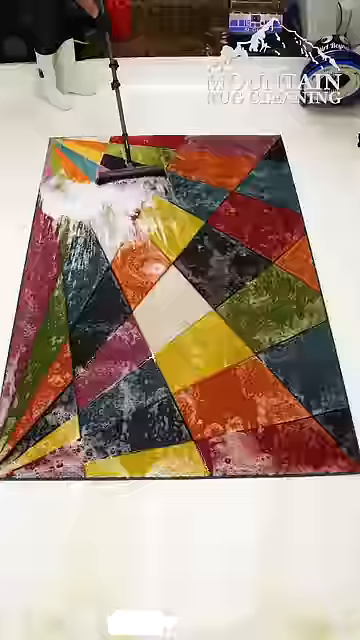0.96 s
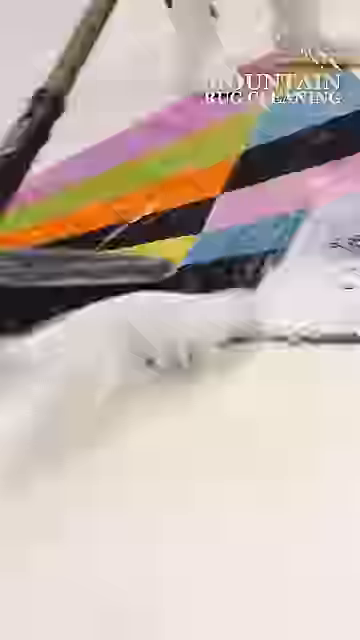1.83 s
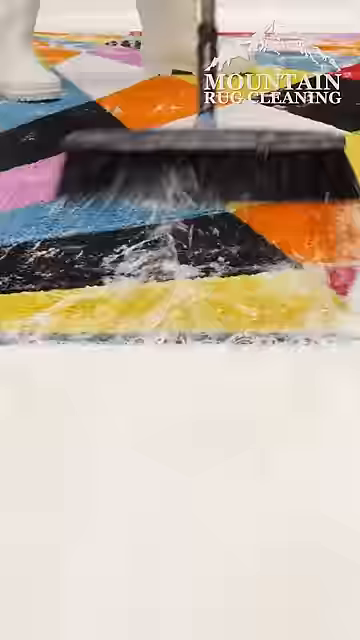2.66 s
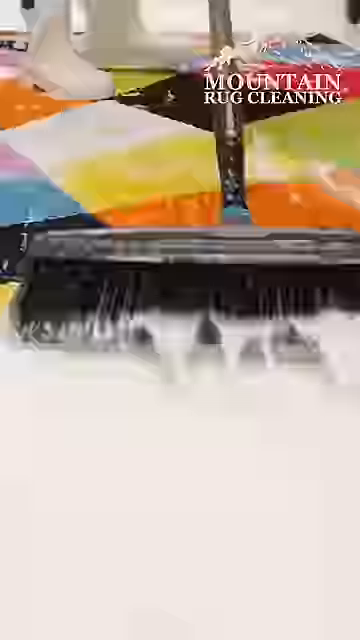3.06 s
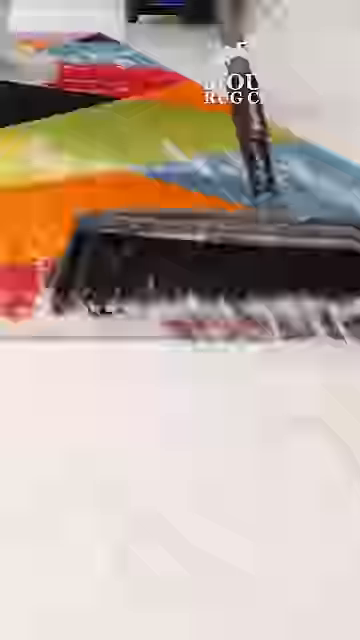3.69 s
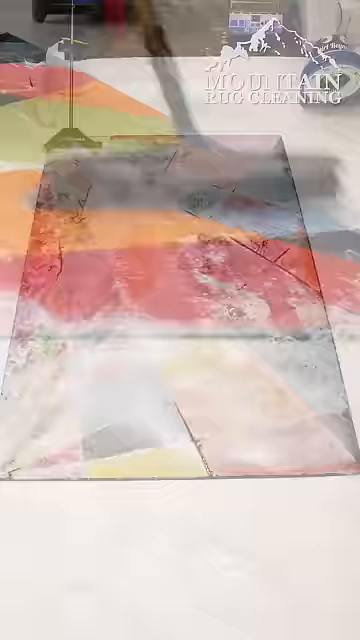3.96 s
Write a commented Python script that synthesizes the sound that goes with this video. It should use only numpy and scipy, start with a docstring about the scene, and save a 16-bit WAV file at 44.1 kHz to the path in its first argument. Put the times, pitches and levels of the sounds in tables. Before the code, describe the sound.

In a quiet room, directly in front of the microphone, a broom thuds onto a soapy rug and starts a fast, rasping scrub. Foam fizzes and the rug throbs underneath as the strokes become longer, with hard pushes and lighter returns. After about four seconds the scrubbing gives way to five slow, swishing, rumbling sweeps. Foam squelches after each, the broom head bumps dully, and bent bristles sometimes snap free.

```python
"""In a quiet room, a stiff push broom is set down on a wet, foamy rug and scrubs very quickly to and fro.
The strokes then grow longer, with hard pushes and light returns. The bristles rasp, the rug's backing
shudders and the broom head bumps on the padded floor. From four seconds on come five slow sweeps:
the pile (the rug's tufts) rumbles under the head, foam squelches at the end of each sweep,
and now and then bent bristles flick free."""
import sys
import numpy as np
from scipy import signal
from scipy.fft import rfft, irfft, next_fast_len
from scipy.io import wavfile
from scipy.ndimage import uniform_filter1d, minimum_filter1d

SR = 44100
rng = np.random.default_rng(int(sys.argv[2]) if len(sys.argv) > 2 else 0)


def master_out(mix):
    """Clip the mix to full scale and print it as 16-bit PCM to the path in sys.argv[1]."""
    frames = np.transpose(np.atleast_2d(mix))
    ceiling = np.clip(frames, -1, 1)
    pcm = np.round(ceiling * 32767).astype(np.int16)
    wavfile.write(sys.argv[1], SR, pcm)


N = 283122
TIME = np.arange(N) / SR

# tone (how strong each frequency is) of the rumbling pile and the swishing foam: f/Hz, level/dB
PILE_TONE = [(15, -48), (25, -19), (87, -4.5), (124, 0.5), (204, -4.5), (361, -8.5), (419, -16.5),
             (452, -16), (591, -21.5), (752, -21.5), (900, -21), (1170, -52), (1980, -120)]
FOAM_TONE = [(250, 1), (500, -2), (1000, -0.5), (2000, -4), (3800, -6), (5500, -10.5), (7500, -14.5),
             (10000, -21), (15500, -37.5)]
# stereo width of the quick strokes and of the slow sweeps: f/Hz, side minus mid/dB
# (mid is what left and right share, side is how they differ)
STROKE_WIDTH = [(30, -22), (90, -5), (160, -8.5), (280, -13), (450, -7), (680, -5.5), (850, -54),
                (2000, -79), (5000, -30.5), (14000, -28)]
SWEEP_WIDTH = [(30, -27), (100, -43), (180, -44), (320, -16), (600, -13), (1300, -19), (4400, -11),
               (8000, -7.5), (15000, 0)]
# how hard the arm scrubs: t/s, level/dB
ARM_EFFORT = [(0.14, -37), (0.25, -26.5), (0.36, -21.5), (0.47, -23), (0.7, -18.5), (0.9, -20),
              (1.25, -19.5), (1.45, -18.5), (1.73, -19), (2.3, -19), (3.08, -20), (4.04, -23), (4.11, -28),
              (4.22, -29.5)]
# slow sweeps: start/s, stop/s, time to bite in/s, rumble/dB, extra rumble as the tufts catch/dB,
# swish/dB, squelch/dB, extra width/dB
SWEEPS = [(3.954, 4.41, 0.16, -25, 8, -35.5, -33.5, 6), (4.601, 4.993, 0.19, -26, 4, -35, -31.5, 1),
          (5.192, 5.515, 0.17, -26.5, 3, -36, -31.5, -6.5),
          (5.747, 6.08, 0.084, -28, 4.5, -36.5, -30.5, -3), (6.325, 6.8, 0.1, -20, 3, -33.5, -32, 0)]


def from_db(db):
    """Turn decibels into a number to multiply by."""
    return 10 ** (np.asarray(db) / 20)


def rms_one(x):
    """Scale a signal so that its average strength (rms) is 1."""
    return x / np.sqrt(np.mean(x ** 2) + 1e-20)


def in_time(rows):
    """Join rows that start with a time by straight lines: one curve for each further column."""
    times, *columns = np.transpose(rows)
    return [np.interp(TIME, times, column) for column in columns]


def at_hz(points, hz):
    """Read a table's level in dB at these frequencies; past its ends it falls 30 dB an octave."""
    table_hz, level_db = np.transpose(points)
    octave, known = np.log2(np.maximum(hz, 1)), np.log2(table_hz)
    outside = np.maximum(known[0] - octave, 0) + np.maximum(octave - known[-1], 0)
    return np.interp(octave, known, level_db) - 30 * outside


def drift(rate_hz):
    """A smooth random wobble, about 1 in size; a higher rate wobbles faster."""
    pole = np.exp(-80 * np.pi * rate_hz / SR)
    noise = rng.standard_normal(N // 40 + 2002)   # one value every 40 samples
    slow = signal.lfilter([1], [1, -2 * pole, pole * pole], noise)[2000:]
    return np.interp(np.arange(N) / 40, np.arange(len(slow)), rms_one(slow))


def shaped_noise(tone, width):
    """Stereo noise of strength 1 with this tone and width, like countless tiny contacts merging."""
    size = next_fast_len(N)
    hz = np.fft.rfftfreq(size, 1 / SR)
    mid, side = rfft(rng.standard_normal((2, size))) * from_db(at_hz(tone, hz))
    mid = irfft(mid, size)[:N]
    side = irfft(side * from_db(at_hz(width, hz)), size)[:N]
    return rms_one(np.array([mid + side, mid - side]))


def ring(clicks, hz, ring_s):
    """Each click starts a pure note that fades by 60 dB in ring_s."""
    decay, angle = from_db(-60 / (ring_s * SR)), 2 * np.pi * hz / SR
    return signal.lfilter([0, np.sin(angle)], [1, -2 * decay * np.cos(angle), decay ** 2], clicks + 1e-18)


def gate(start, end, edge_s):
    """Fade in around start and out around end."""
    return (np.tanh((TIME - start) / edge_s) - np.tanh((TIME - end) / edge_s)) / 2


def with_travel(short, long):
    """Blend from the value for short strokes to the value for long ones as the broom travels further."""
    long_share = [(0.2, 0.01), (1.3, 0), (1.9, 0.41), (2.3, 0.91), (3.0, 1)]   # how long the quick strokes are: t/s, share of long travel/0-1
    return np.interp(in_time(long_share)[0], [0, 1], [short, long])


def stroke_count():
    """Strokes done so far; even ones are pushes, odd ones returns."""
    pace = [(0.118, 0), (1.177, 10), (1.807, 16), (2.263, 19), (3.349, 26), (4.156, 31), (4.32, 32)]   # about 9.5, later 6.4 to-and-fros a second: t/s, to-and-fros done
    cycles, = in_time(pace)
    push_share = with_travel(0.54, 0.59)   # of the time of one to-and-fro
    phase = cycles % 1
    in_return = 1 + (phase - push_share) / (1 - push_share)
    return 2 * np.floor(cycles) + np.where(phase < push_share, phase / push_share, in_return)


def stroke_speed(push_skew, return_skew):
    """Speed of the bristle tips, 0-1: zero at each turn; a skew above 1 makes it peak late."""
    done = stroke_count()
    skew = np.where(done % 2 < 1, push_skew, return_skew)
    return np.abs(np.sin(np.pi * (done % 1) ** skew))


def quiet_room(level_db=-52.5):
    """The room gives a faint, steady hush."""
    room_tone = [(25, -6), (120, -6), (400, 15), (1000, 1), (4000, -34), (10000, -50), (15500, -41)]   # the hush: f/Hz, level/dB
    return from_db(level_db) * shaped_noise(room_tone, STROKE_WIDTH)


def set_down(thud_db=-25, slosh_db=-41.5, thud_fall_db_per_s=230, slosh_fall_db_per_s=95):
    """The broom lands in the foam: a dull thud and a wet slosh die away."""
    thud = from_db(thud_db - thud_fall_db_per_s * TIME) * shaped_noise(PILE_TONE, STROKE_WIDTH)
    slosh = from_db(slosh_db - slosh_fall_db_per_s * TIME) * shaped_noise(FOAM_TONE, SWEEP_WIDTH)
    return (thud + slosh) * gate(0.00067, 1, 0.0015) * gate(-1, 0.17, 0.038)


def head_bumps(vary_db=5.0):
    """Each bump makes the broom head and padded floor ring briefly, each note with its own strength."""
    bump_list = [(0.002, -10.5), (0.235, -24), (0.407, -7), (0.43, -5), (0.531, -17), (0.845, -14.5),
                 (1.28, -21), (1.391, -20), (1.603, -17), (2.784, -22), (3.859, -24), (4.012, -16),
                 (4.154, -16), (4.171, -10), (4.353, -15), (4.618, -16), (4.854, -18), (5.382, -10),
                 (5.905, -16.5), (6.392, -14.5)]   # the head hits the rug: t/s, level/dB
    head_notes = [(75, -7, 0.072), (116, -9.5, 0.17), (161, -8, 0.066), (223.4, -9, 0.087),
                  (313, -25, 0.075), (415, -20, 0.076)]   # notes of head and floor: f/Hz, level/dB, time to fade by 60 dB/s
    times, bump_db = np.transpose(bump_list)
    chance = rng.standard_normal((len(bump_list), len(head_notes)))
    out = np.zeros(N)
    for k, (hz, note_db, ring_s) in enumerate(head_notes):
        clicks = np.zeros(N)
        clicks[(times * SR).astype(int)] = from_db(bump_db + note_db + vary_db * chance[:, k])
        out += (-1) ** k * ring(clicks, hz, ring_s)
    return out


def quick_scrub(slide_db=1.83, fizz_db=-3.5, fizz_s=0.051, uneven_db=0.96, hollow_db=-6.0,
                treble_hz=5500, treble_lag_s=0.00085):
    """Bristles rasp louder with speed, fast pushes ring hollow, and foam fizzes through the turns."""
    short_tone = [(150, -43), (250, -17.5), (499, -4), (563, -6), (795, -1.5), (961, -3), (1100, 0),
                  (1360, -2.5), (1530, -3.5), (1730, -4), (3330, -4), (8320, -13.5), (11200, -23),
                  (15500, -35)]   # bristles on the pile, short strokes: f/Hz, level/dB
    long_tone = [(240, -23), (400, -21), (419, -18.5), (560, -11.5), (653, -3), (847, -0.5), (1260, -5),
                 (1630, -3), (2360, -7.5), (3850, -6), (5820, -10), (8280, -10), (9790, -12), (13700, -28),
                 (15500, -36)]   # the same for longer strokes: f/Hz, level/dB
    hollow_tone = [(520, -23), (680, -5.5), (850, 4.5), (1080, -7.5), (1300, -9), (1650, 0.5), (2100, -7)]   # ring of the foam packed between the bristles: f/Hz, level/dB
    pushing = stroke_count() % 2 < 1
    effort_db, = in_time(ARM_EFFORT)
    return_db = np.where(pushing, 0, with_travel(-1, -5))   # longer strokes come back more lightly
    pressure = from_db(effort_db + return_db) * gate(0.14, 4.25, 0.019)
    speed = stroke_speed(push_skew=0.88, return_skew=0.97)
    slide = from_db(slide_db) * pressure * speed ** np.where(pushing, 1.27, 0.92)
    lowest_pressure = minimum_filter1d(pressure, int(fizz_s * SR))
    fizz = from_db(fizz_db) * uniform_filter1d(lowest_pressure, int(fizz_s * SR / 2))
    level = np.hypot(slide, fizz) * from_db(uneven_db * drift(37))
    travel = with_travel(0, 1)
    rasp = np.sqrt(1 - travel) * shaped_noise(short_tone, STROKE_WIDTH)
    rasp += np.sqrt(travel) * shaped_noise(long_tone, STROKE_WIDTH)
    dull = signal.sosfiltfilt(signal.butter(2, treble_hz, fs=SR, output="sos"), rasp)
    # the fine hiss of the tips trails the rasp of the bending bristles
    hiss = np.interp(TIME - treble_lag_s, TIME, level) * (rasp - dull)
    hollow_level = from_db(hollow_db) * pushing * pressure * speed ** 2.7
    return level * dull + hiss + hollow_level * shaped_noise(hollow_tone, STROKE_WIDTH)


def rug_backing(throb_db=8.5, jolt_db=4.5):
    """The rug's backing shudders in step with the effort and is jolted as each push begins."""
    deep_tone = [(13, -41), (22, -12), (43, -20.5), (81, -7), (97, -10), (130, -13.5), (170, -44),
                 (290, -120)]   # the deepest shudder: f/Hz, level/dB
    body_tone = [(53, -42), (90, -18), (107, -11.5), (124, -7), (145, -3), (421, -12), (450, -15),
                 (580, -44), (990, -120)]   # the low throb above it: f/Hz, level/dB
    effort_db, = in_time(ARM_EFFORT)
    throb = throb_db * (stroke_speed(push_skew=1.3, return_skew=0.81) - 2 / np.pi)
    jolt = jolt_db * np.cos(np.pi * stroke_count())
    deep_db = -14.5 - 21 * with_travel(0, 1) ** 1.3   # short strokes shake it deepest
    body_db = with_travel(-16, -17)
    deep = from_db(effort_db + deep_db + jolt) * shaped_noise(deep_tone, STROKE_WIDTH)
    body = from_db(effort_db + body_db + throb) * shaped_noise(body_tone, STROKE_WIDTH)
    return (deep + body) * gate(0.15, 3.99, 0.0092)


def slow_sweeps(rest_rumble_db=-39.5, rest_swish_db=-44.5, bite_db=11, catch_lead_s=0.022, catch_s=0.034,
                foam_runs_on_s=0.077, judder_db=2.5, froth_db=1.0):
    """The head bites into the pile, judders along, catches and stops; the foam swishes on a little."""
    sweeping = gate(SWEEPS[0][0], 7, 0.008)
    # between sweeps the broom is drawn back lightly
    drag, swish = from_db(rest_rumble_db) * sweeping, from_db(rest_swish_db) * sweeping
    for start, stop, bite_s, rumble_db, catch_db, swish_db, _, _ in SWEEPS:
        bite = bite_db * (np.clip((TIME - start) / bite_s, 0, 1) - 1)
        catch = catch_db * np.exp(-((TIME - stop + catch_lead_s) / catch_s) ** 2)
        drag = np.hypot(drag, from_db(rumble_db + bite + catch) * gate(start, stop, 0.016))
        foam_sliding = gate(start, np.inf, 0.04) * gate(-np.inf, stop + foam_runs_on_s, 0.014)
        swish = np.hypot(swish, from_db(swish_db) * foam_sliding)
    pile = drag * from_db(judder_db * drift(29)) * shaped_noise(PILE_TONE, SWEEP_WIDTH)
    foam = swish * from_db(froth_db * drift(55)) * shaped_noise(FOAM_TONE, SWEEP_WIDTH)
    return pile + foam


def foam_squelches(delay_s=0.056, rise_s=0.062, fall_s=0.023, bubbling_db=4.0,
                   pitch_hz=1220, sink_octaves_per_s=16, spread_octaves=0.77):
    """As each sweep stops, foam pockets burst: a noise that swells, then sinks in pitch and dies."""
    out = np.zeros((2, N))
    for hz in np.geomspace(350, 5000, 9):
        power = np.zeros(N)
        for _, stop, *_, squelch_db, _ in SWEEPS:
            near = np.abs(TIME - stop) < 0.3
            since_peak = TIME[near] - stop - delay_s
            swell = np.exp(np.minimum(since_peak / rise_s, -since_peak / fall_s))
            octaves_off = np.log2(hz / pitch_hz) + sink_octaves_per_s * np.maximum(since_peak, 0)
            band_share = np.exp(-(octaves_off / spread_octaves) ** 2 / 2)
            power[near] += from_db(squelch_db) ** 2 * swell * band_share
        half_octave = signal.butter(2, [hz / 2 ** 0.25, hz * 2 ** 0.25], "band", fs=SR, output="sos")
        noise = rms_one(signal.sosfilt(half_octave, rng.standard_normal(N)))
        out += np.sqrt(power) / 2 * noise * from_db(bubbling_db * drift(55))
    return out


def bristle_flicks(patter_db=0.5):
    """Rows of bent bristles snap straight in a short, bright spray."""
    flick_list = [(4.571, 0.009, -33.5, 0.0012), (4.618, 0.022, -29, 0.0015), (4.644, 0.035, -27.5, 0.0055),
                  (4.684, 0.024, -24, 0.006), (4.725, 0.013, -32.5, .002), (4.779, 0.0084, -32, .0015),
                  (5.679, 0.0065, -37, .002), (5.771, 0.031, -29.5, 0.011), (6.388, 0.023, -30, .003)]   # bristles spring free: t/s, length/s, level/dB, edge softness/s
    flick_tone = [(880, -38), (1500, -5), (1770, -6), (2310, 2), (2720, -2), (3580, 0.5), (4270, -5),
                  (5890, -3.5), (12600, -20.5), (15500, -31)]   # their bright snap: f/Hz, level/dB
    level = sum(from_db(db) * gate(t, t + length, edge_s) for t, length, db, edge_s in flick_list)
    return level * from_db(patter_db * drift(150)) * shaped_noise(flick_tone, SWEEP_WIDTH)


def scene():
    """The broom, straight ahead in a quiet room; each slow sweep has its own stereo width."""
    quick = set_down() + quick_scrub() + rug_backing()
    slow = slow_sweeps() + foam_squelches() + bristle_flicks()
    width_db, = in_time([((start + stop) / 2, db) for start, stop, *_, db in SWEEPS])
    centre = slow.mean(axis=0)
    slow = centre + (slow - centre) * from_db(width_db)
    return quick + slow + head_bumps() + quiet_room()


def record(dry):
    """Cut the highest treble steeply, above 15750 Hz."""
    return signal.sosfilt(signal.ellip(12, 0.1, 90, 15750, fs=SR, output="sos"), dry)


dry = scene()
out = record(dry)
master_out(out)
```